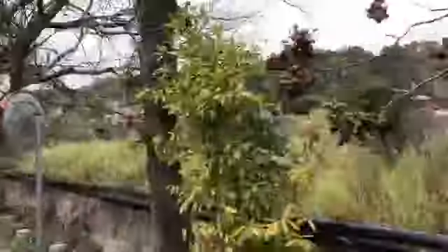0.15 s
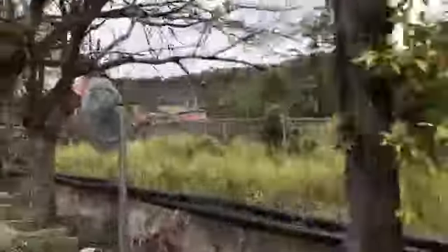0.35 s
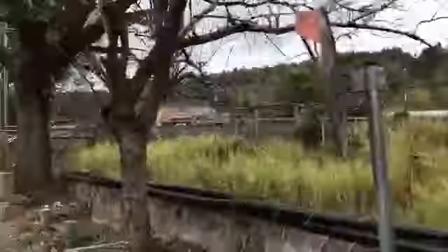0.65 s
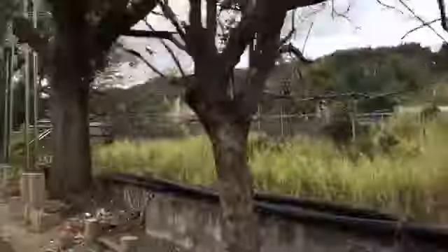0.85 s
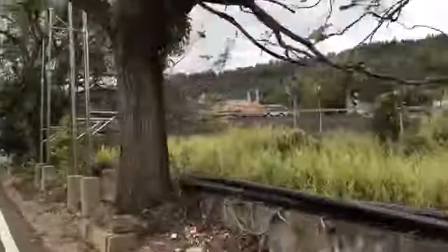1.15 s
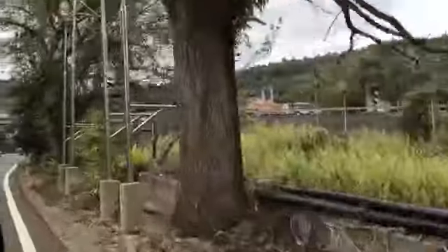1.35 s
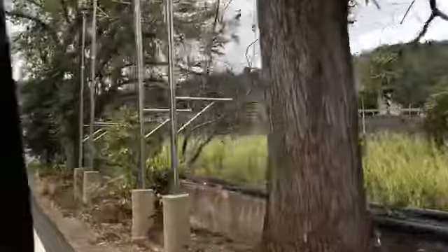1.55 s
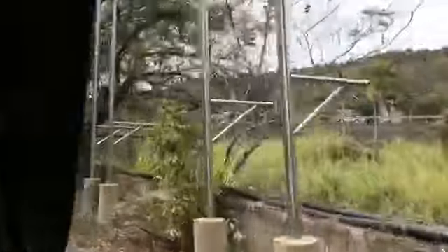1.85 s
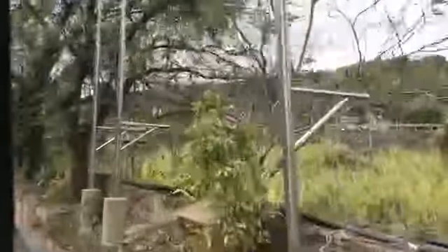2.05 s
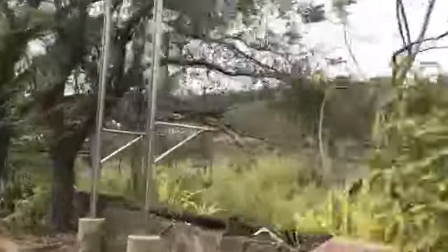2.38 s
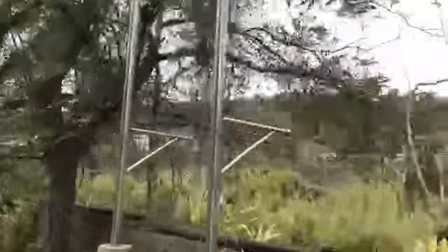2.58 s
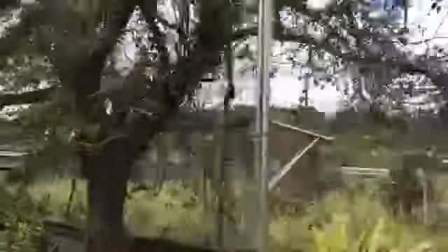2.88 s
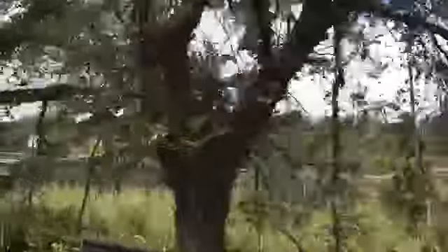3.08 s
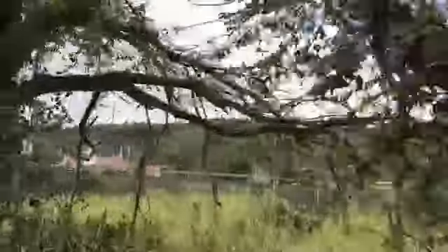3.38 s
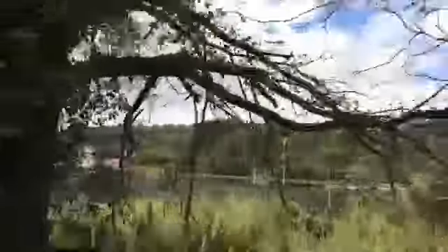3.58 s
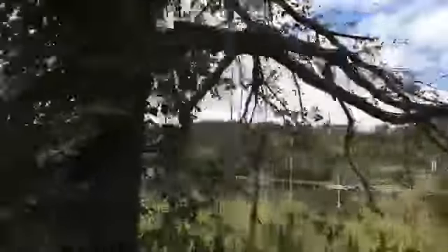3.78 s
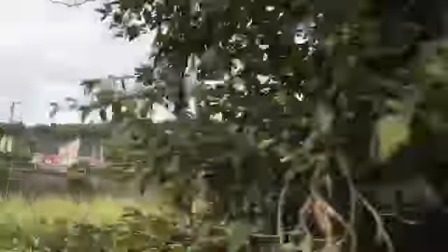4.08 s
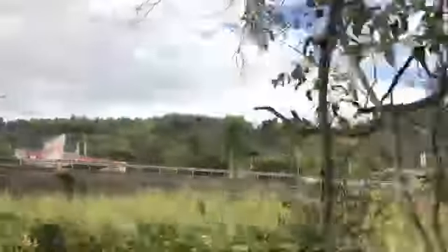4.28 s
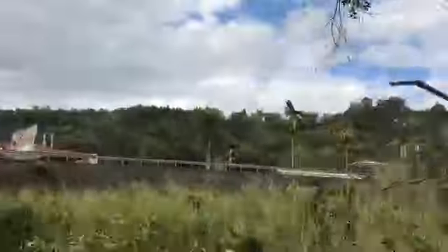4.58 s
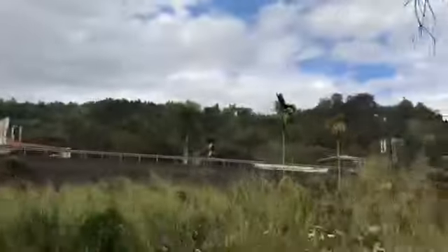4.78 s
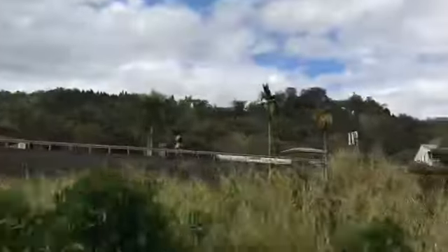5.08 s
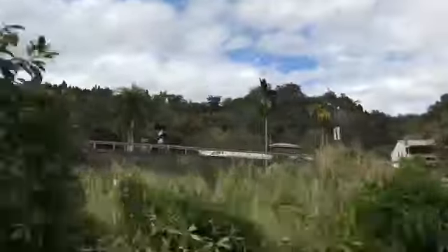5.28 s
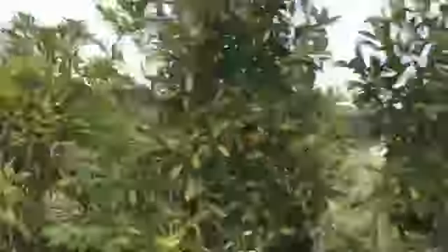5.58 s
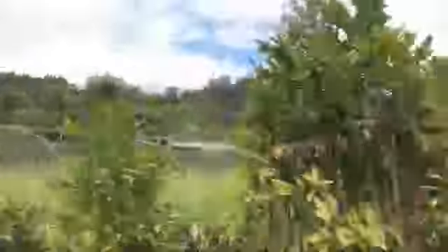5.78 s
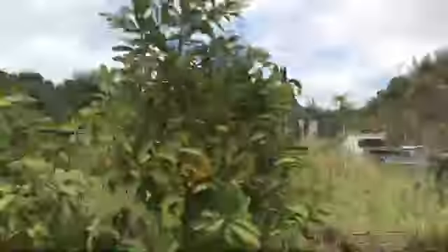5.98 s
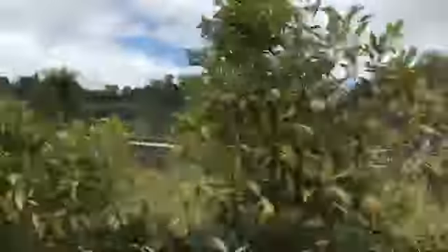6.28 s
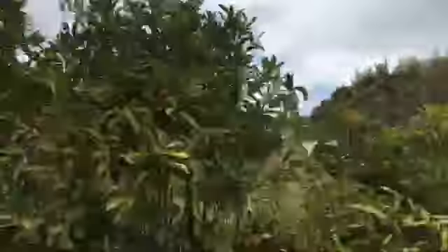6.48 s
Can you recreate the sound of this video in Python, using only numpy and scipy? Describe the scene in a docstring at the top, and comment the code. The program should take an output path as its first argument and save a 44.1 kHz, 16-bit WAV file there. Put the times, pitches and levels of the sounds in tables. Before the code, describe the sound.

From a car driving along a road, gusts rumble, flap and snap directly on a phone microphone at the open window. The wind drops for a couple of seconds in the middle, leaving the rush of tyres, a high hiss and a slight whistle above a gentler rumble. Duller buffeting then returns and grows strong again. The engine hums low underneath throughout.

```python
"""At the window of a moving car, a phone is held out in the wind. Swirls of air (eddies) hit its
microphone some twenty times a second, each a thud with a ragged flap, at times driving its limiter.
Sharp eddies also crackle and snap; blunt ones, in slower air, only thud. The engine drones underneath.
From about 3 s the phone is sheltered for two seconds or so: tyre roar, air hiss and a faint whistle
come through a softer rumble."""
import sys
import numpy as np
from scipy import signal
from scipy.fft import rfft, irfft
from scipy.io import wavfile
from scipy.ndimage import uniform_filter1d, minimum_filter1d

SR = 44100
rng = np.random.default_rng(int(sys.argv[2]) if len(sys.argv) > 2 else 0)


def persist_wave(psi):
    """Save psi, clipped to +-1, as 16-bit WAV."""
    counts = np.round(np.clip(psi, -1, 1) * 32767).astype(np.int16)
    wavfile.write(sys.argv[1], SR, np.atleast_2d(counts).T)


N = 292824


def gain_of(db):
    """Turns decibels into a number to multiply a sound by."""
    return 10 ** (np.asarray(db) / 20)


def evened(x):
    """Scales a signal so that its average size (rms) is one."""
    return x / np.sqrt(np.mean(x ** 2) + 1e-20)


def follow(rows):
    """Joins (time, level) points with straight lines, giving a level for every sample."""
    times, levels = np.transpose(rows)
    return np.interp(np.arange(N) / SR, times, levels)


def add(mix, time_s, sound):
    """Lays a sound into the mix at the given time."""
    start = round(time_s * SR)
    sound = sound[max(-start, 0):]
    part = mix[max(start, 0):][:len(sound)]
    part += sound[:len(part)]


def ring(tone, size=8192):
    """Builds a filter from (frequency, level) points: the short ring it gives after one click."""
    hz, db = np.transpose(tone)
    grid_hz = abs(np.fft.fftfreq(size, 1 / SR)) + 1
    log_gain = np.log(gain_of(np.interp(np.log(grid_hz), np.log(hz), db)))
    spectrum = np.exp(np.conj(signal.hilbert(log_gain)))  # so nothing rings before the click
    response = np.fft.ifft(spectrum).real[:size // 2]
    fade = np.cos(np.linspace(0, np.pi / 2, len(response))) ** 2
    return response * fade


def colour(x, tone):
    """Filters a sound to the given tone, at an average size of one."""
    return evened(signal.oaconvolve(x, ring(tone))[:N])


def wander(hz):
    """A smooth random curve that changes up to about hz times a second."""
    keep_slow = np.exp(-(np.fft.rfftfreq(N, 1 / SR) / hz) ** 2)
    return evened(irfft(rfft(rng.standard_normal(N)) * keep_slow, N))


def lumps(hz, depth_db):
    """A volume that rises and falls at random, as churning air does."""
    return gain_of(depth_db * np.clip(wander(hz), -2, 2))


def with_flow(flow_db, full_db, slope):
    """A level that is full_db in full wind (-22 dB) and moves by slope dB for each dB of wind."""
    return full_db + slope * (flow_db + 22)


# How strong the wind is at the microphone: (time [s], level [dB])
AIRFLOW = [(0.0, -22), (0.2, -20), (0.5, -23), (0.8, -23.5), (1.1, -20.5), (1.5, -22.5), (1.85, -30),
           (2.0, -26), (2.85, -31), (3.05, -43), (3.4, -36.7), (4.6, -37), (5.07, -35), (5.68, -39),
           (5.79, -22), (5.93, -31), (6.62, -32)]
# The tone of each wind noise, from low to high: (frequency [Hz], relative level [dB])
RUMBLE_TONE = [(15, -34.5), (30, -9), (48, 5.5), (75, 11), (110, 6.5), (180, 0.5), (300, -7), (600, -55)]
FLUTTER_TONE = [(80, -13.5), (200, -7.5), (330, -1), (480, -6.5), (620, -5), (1000, -15), (1600, -31),
                (2500, -45.5), (4000, -32), (7000, -61)]
CRACKLE_TONE = [(300, -27), (700, 1.5), (1050, 4), (1600, -4), (2300, -12), (3000, -18), (3800, -36),
                (4900, -34), (7000, -45), (15000, -55)]
def slipstream():
    """Air rushing past rumbles and flutters; as it grows stronger it turns ragged and spits."""
    flow_db = follow(AIRFLOW)
    ragged = np.clip((flow_db + 47) / 14, 0, 1)  # 0 is smooth air, 1 is fully torn
    gusts = lumps(hz=32, depth_db=5.5)
    churn = gusts * lumps(hz=400, depth_db=5.5)
    rumble = colour(rng.standard_normal(N) * gusts ** .45, RUMBLE_TONE)
    smooth = colour(rng.standard_normal(N), FLUTTER_TONE)
    torn = colour(rng.standard_normal(N) * churn, FLUTTER_TONE)
    flutter = np.sqrt(1 - ragged) * smooth + np.sqrt(ragged) * torn
    spit = colour(rng.standard_normal(N) * churn ** 1.45, CRACKLE_TONE)
    return (gain_of(with_flow(flow_db, full_db=-21, slope=.66)) * rumble
            + gain_of(with_flow(flow_db, full_db=-27.5, slope=1.02)) * flutter
            + gain_of(with_flow(flow_db, full_db=-37.8, slope=1.3)) * spit)


# The tone of the tyres: (frequency [Hz], relative level [dB])
TYRE_TONE = [(200, -1), (560, -13.5), (750, -6), (1000, 1.5), (1300, 1.5), (1800, -3.5), (2200, -6),
             (2800, -10.5), (3200, -10), (4000, -12), (4900, -19), (6300, -17.5), (7500, -30), (10000, -73)]
# How loud they are, loudest while the phone is sheltered: (time [s], level [dB])
TYRE_LEVEL = [(0.0, -43), (0.6, -47), (1.7, -50.5), (2.75, -45.5), (3.05, -40), (3.1, -43.5), (3.5, -40.7),
              (4.0, -41.8), (5.6, -41.5), (5.85, -46.5), (6.6, -49.5)]
def tyre_roar():
    """Tyres roar on the road, and the roadside throws back an echo from a drifting distance."""
    roar = colour(rng.standard_normal(N) * lumps(hz=8.5, depth_db=.75), TYRE_TONE)
    delay_s = .0062 + .0003 * wander(hz=.48)
    echo = np.interp(np.arange(N) - delay_s * SR, np.arange(N), roar)
    return gain_of(follow(TYRE_LEVEL)) * evened(roar + .24 * echo)


# The tone of the hiss: (frequency [Hz], relative level [dB])
HISS_TONE = [(1500, -5), (3500, 4), (6000, 4), (7500, 1.5), (8800, 2.5), (10300, -4.5), (11500, -2),
             (13000, -1.5), (15800, -4)]
# How loud it is; near 3 s it swells, then drops at once: (time [s], level [dB])
HISS_LEVEL = [(0.0, -52), (0.5, -58.5), (1.3, -57), (1.7, -60), (2.2, -55.7), (2.68, -59), (2.76, -54.5),
              (3.065, -49.5), (3.08, -62), (4.3, -56.7), (5.6, -57.3), (6.6, -69)]
def air_hiss():
    """Air sliding along the car makes a high, even hiss."""
    return gain_of(follow(HISS_LEVEL)) * colour(rng.standard_normal(N), HISS_TONE)


# The pure tones of the drone and the gear whine: (multiple of the firing rate [times], level [dB])
ENGINE_TONES = [(1, -38.5), (2, -46), (3, -44.5), (6, -52), (13, -52.5)]
def engine(firing_hz=74.26):
    """The engine's rapid firing makes a low, wavering drone under the wind, and the gears add a faint whine
    above it."""
    cycles = np.cumsum(firing_hz * (1 + .015 * wander(hz=4.84))) / SR
    return sum(gain_of(db) * np.sin(2 * np.pi * multiple * cycles) * lumps(hz=7.3, depth_db=5)
               for multiple, db in ENGINE_TONES)


def weak_eddies(per_second=14, spread_db=2.2):
    """Lists weak eddies at uneven times, stronger and sharper in more wind; rows like STRONG_EDDIES."""
    flow_db = follow(AIRFLOW)
    rows = []
    for k, (late, size, force) in enumerate(rng.standard_normal((200, 3))):
        time_s = (k + .5 + .3 * late) / per_second
        if 0 < time_s < N / SR:
            now_db = flow_db[int(time_s * SR)]
            half_s = .009 * np.exp(.35 * size)
            strength_db = with_flow(now_db, full_db=-24, slope=.66) + spread_db * np.clip(force, -2, 2)
            sharp_db = with_flow(now_db, full_db=-2, slope=1.15)
            rows.append((time_s, half_s, strength_db, sharp_db))
    return rows


# How each part of an eddy's sound follows the eddy: (usual level [dB], change with strength [dB/dB],
# with sharpness [dB/dB], with length [dB per doubling], share of the length [times], head start [s])
THUD_RULE = (-13.3, 1.09, -.19, .3, .7, .0025)
FLAP_RULE = (-15.9, 1.03, .19, -.8, .8, .0018)
CRACKLE_RULE = (-24.4, 1.02, 1.17, .1, .5, .0006)
SNAP_RULE = (-53, 1.6, 2.5, -2.8, .3, .0004)
# The tones of the parts, along with CRACKLE_TONE above: (frequency [Hz], relative level [dB])
THUD_TONE = [(15, -61), (30, -18), (48, 3), (70, 2.5), (130, -2.5), (200, -7.5), (320, -23), (700, -90.5),
             (4000, -110)]
FLAP_TONE = [(70, -12.5), (140, -1.5), (210, 0.5), (330, -1), (480, -6), (600, -7), (900, -16), (1400, -25),
             (3000, -54.5), (9000, -97)]
SNAP_TONE = [(1000, -14), (2300, 1), (3000, -3), (3800, 0), (4900, -14), (6200, -19), (7500, -30),
             (10000, -40), (15000, -50)]
# The big swirls that hit the phone: (time [s], half length [s], strength [dB], sharpness [dB])
STRONG_EDDIES = [(0.056, 0.011, -14.0, 2.0), (0.151, 0.009, -17.5, -3), (0.195, 0.018, -12.0, -13.0),
                 (0.259, 0.0018, -11.0, 5.0), (0.283, 0.0034, -19.0, 1.0), (0.315, 0.008, -21.5, 2.0),
                 (0.36, 0.002, -8.0, 8.0), (0.4, 0.009, -18.5, 2.0), (0.448, 0.0033, -17.5, 4.0),
                 (0.53, 0.005, -17.0, -2.0), (0.577, 0.008, -18.5, -13.0), (0.629, 0.0034, -15.5, 4.0),
                 (0.663, 0.005, -15.0, 0.0), (0.704, 0.009, -14.0, -1.0), (0.752, 0.005, -11.0, -3.0),
                 (0.831, 0.0039, -16.0, 2.0), (0.935, 0.012, -19.0, 3.0), (0.978, 0.015, -16.0, 0.0),
                 (1.029, 0.002, -19.5, 6.0), (1.094, 0.0063, -14.5, 1.0), (1.152, 0.0043, -24.0, 7.0),
                 (1.211, 0.011, -19.5, 6.0), (1.252, 0.0041, -15.0, 5.0), (1.321, 0.002, -19.0, 9.0),
                 (1.367, 0.011, -18.5, 2.0), (1.404, 0.008, -12.0, 4.0), (1.438, 0.0047, -13.0, -3.0),
                 (1.485, 0.0058, -13.5, 1.0), (1.535, 0.01, -16.0, -1.0), (1.58, 0.01, -19.5, 3.0),
                 (1.62, 0.013, -14.5, 1.0), (1.726, 0.006, -17.5, 2.0), (1.782, 0.008, -21.0, 2.0),
                 (1.824, 0.004, -15.5, 2.0), (1.9, 0.009, -22, -3), (1.966, 0.01, -11.5, -4.0),
                 (2.009, 0.0033, -14.5, 0.0), (2.062, 0.0034, -14.0, 3.0), (2.109, 0.015, -15.5, -5.0),
                 (2.142, 0.0054, -14.0, -4.0), (2.204, 0.0064, -21.0, 5.0), (2.242, 0.0094, -13.5, -4.0),
                 (2.286, 0.003, -16.5, 2.0), (2.303, 0.004, -12.5, -6.0), (2.353, 0.006, -14.5, 2.0),
                 (2.426, 0.0039, -15.5, -10.0), (2.515, 0.0059, -19.5, -3.0), (2.579, 0.006, -12.0, 3.0),
                 (2.66, 0.006, -15.0, 0.0), (2.713, 0.0025, -16.0, 0.0), (2.774, 0.0042, -18.0, -3.0),
                 (2.823, 0.01, -12.0, -3.0), (2.927, 0.0051, -18.0, -10.0), (2.969, 0.01, -12.5, -7.0),
                 (3.639, 0.009, -27.0, -17.0), (3.811, 0.007, -26.0, -22.0), (4.086, 0.0096, -21.0, -15.0),
                 (4.377, 0.014, -26.5, -16.0), (4.51, 0.015, -22.5, -17.0), (4.656, 0.0075, -20.0, -11.0),
                 (4.86, 0.0062, -12.0, -13.0), (4.923, 0.004, -20.5, -24.0), (4.948, 0.005, -8.5, -11.0),
                 (5.011, 0.0082, -19.0, -7.0), (5.113, 0.0055, -16.5, -18.0), (5.186, 0.013, -18.5, -18.0),
                 (5.223, 0.009, -14.0, -7.0), (5.316, 0.002, -17.5, -7.0), (5.345, 0.008, -19.0, -23.0),
                 (5.398, 0.007, -20.5, -8.0), (5.464, 0.0059, -13.0, -20.0), (5.508, 0.009, -16.5, -12.0),
                 (5.581, 0.009, -18.0, -11.0), (5.727, 0.0053, -5.5, -3.0), (5.799, 0.008, -12.5, -8.0),
                 (5.828, 0.009, -10.0, -6.0), (5.874, 0.0063, -13.0, -4.0), (5.915, 0.005, -17.5, -16.0),
                 (5.968, 0.008, -12.5, -17.0), (6.009, 0.009, -9.0, -1.0), (6.046, 0.0026, -15.5, -7.0),
                 (6.081, 0.008, -12.0, -6.0), (6.218, 0.0038, -11.5, -4.0), (6.269, 0.0038, -15.5, -2.0),
                 (6.328, 0.0084, -14.5, -7.0), (6.431, 0.009, -9.0, -3.0), (6.489, 0.0066, -11.0, 2.0),
                 (6.524, 0.006, -13.5, -5.0), (6.558, 0.003, -18.0, -4.0), (6.582, 0.006, -18.5, 1.0),
                 (6.63, 0.005, -8.5, -2.0)]
def eddy_hits(usual_strength_db=-15, usual_half_s=.008):
    """Each eddy hits the microphone as a burst of pressure, with the fine crackle bunched in its middle."""
    t = np.arange(-SR // 25, SR // 25) / SR
    shreds = lumps(hz=370, depth_db=6.5)  # the higher parts are torn up more by this
    parts = [(ring(THUD_TONE), rng.standard_normal(N), THUD_RULE),
             (ring(FLAP_TONE), rng.standard_normal(N) * shreds, FLAP_RULE),
             (ring(CRACKLE_TONE), rng.standard_normal(N) * shreds ** 2, CRACKLE_RULE),
             (ring(SNAP_TONE), rng.standard_normal(N) * shreds ** 2.7, SNAP_RULE)]
    from_peak = abs(t) * np.where(t < 0, 1.9, 1.02)  # an eddy arrives faster than it leaves
    out = np.zeros(N)
    for time_s, half_s, strength_db, sharp_db in list(STRONG_EDDIES) + weak_eddies():
        here = (round(time_s * SR) + np.arange(len(t))) % N
        harder = strength_db - usual_strength_db
        longer = np.log2(half_s / usual_half_s)
        for response, noise, (usual_db, by_strength, by_sharpness, by_length, share, early_s) in parts:
            db = usual_db + by_strength * harder + by_sharpness * sharp_db + by_length * longer
            swell = 1 / np.cosh(from_peak / (half_s * share))  # a bell-shaped rise and fall
            burst = signal.fftconvolve(noise[here] * swell, response)
            burst *= np.sqrt(.02 * SR / np.sum(burst ** 2))  # as much energy as 0.02 s at 0 dB
            add(out, time_s + t[0] - early_s, gain_of(db) * burst)
    return out


# How loud the whistle is; it swells from about 4 s: (time [s], level [dB])
WHISTLE_LEVEL = [(3.9, -70), (4.2, -53), (4.6, -58), (5.1, -52), (5.55, -58), (5.9, -78)]
def whistle(pitch_hz=3160, width_hz=110):
    """Air sings past the edge of the window with a faint, breathy note."""
    angle = 2 * np.pi * pitch_hz * np.arange(N) / SR
    note = wander(width_hz) * np.cos(angle) + wander(width_hz) * np.sin(angle)
    return gain_of(follow(WHISTLE_LEVEL)) * note


def scene():
    """Wind on the microphone over the sounds of the car, in one channel."""
    return (eddy_hits() + slipstream() + tyre_roar() + air_hiss() + whistle() + engine())[None]


def record(dry):
    """The phone's limiter briefly turns down the hardest hits; then the highest treble is cut off."""
    ceiling, top_hz = .95, 15900
    gain = minimum_filter1d(ceiling / np.maximum(abs(dry), ceiling), size=61)
    gain = uniform_filter1d(uniform_filter1d(gain, size=31), size=31)  # smooth each dip
    end_fades = signal.windows.tukey(N, .001)
    treble_cut = signal.firwin(511, top_hz, window=("kaiser", 9), fs=SR)
    return signal.oaconvolve(dry * gain * end_fades, treble_cut[None], "same")


dry = scene()
out = record(dry)
persist_wave(out)
```